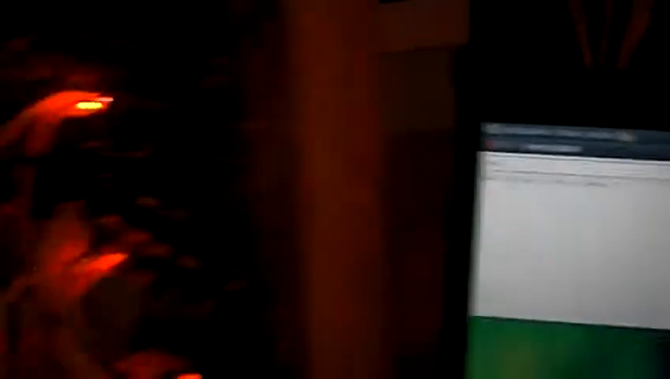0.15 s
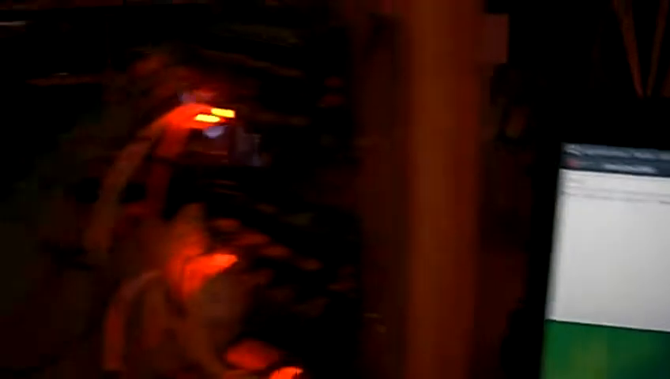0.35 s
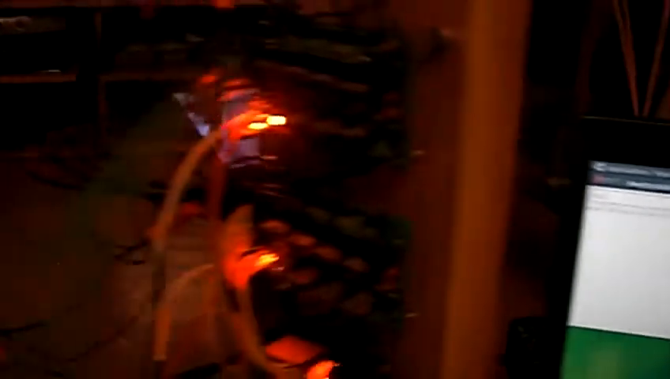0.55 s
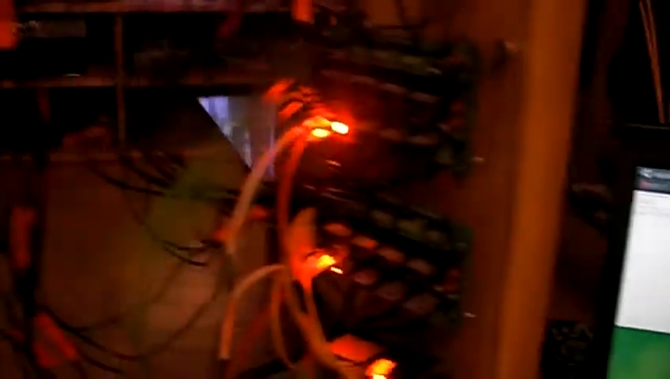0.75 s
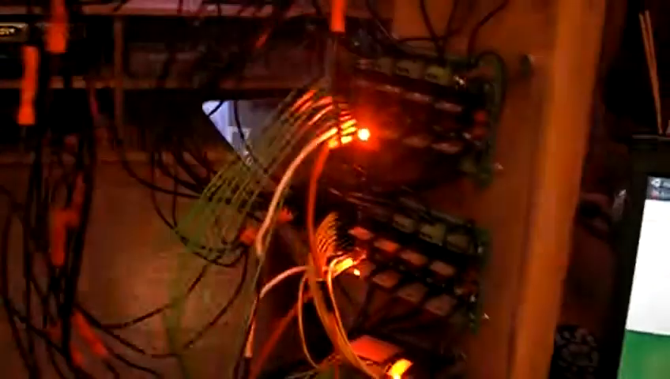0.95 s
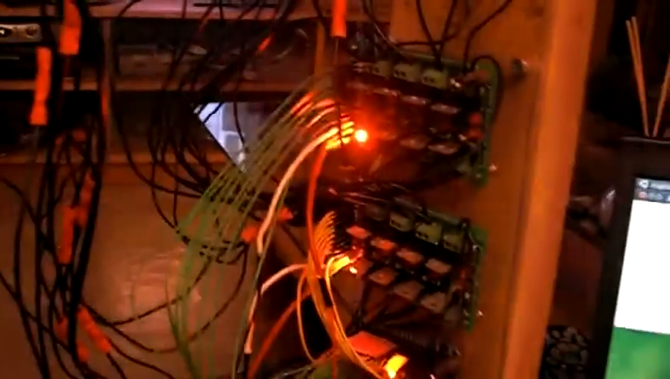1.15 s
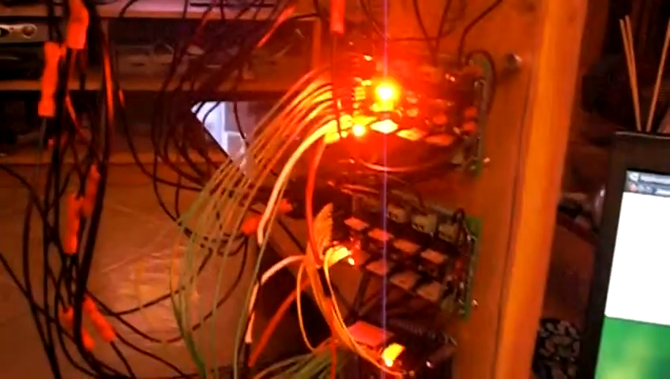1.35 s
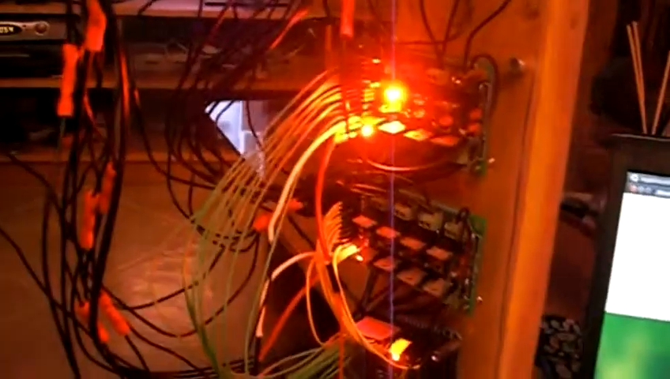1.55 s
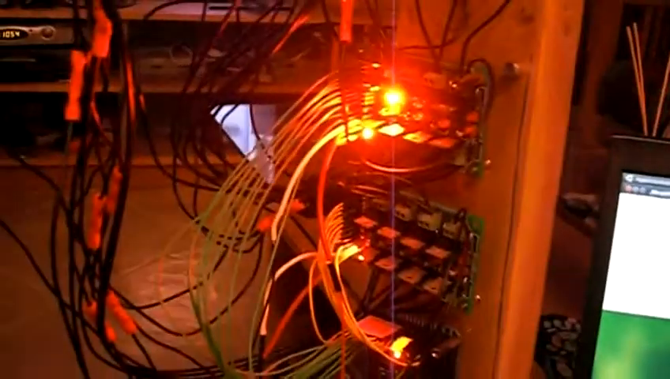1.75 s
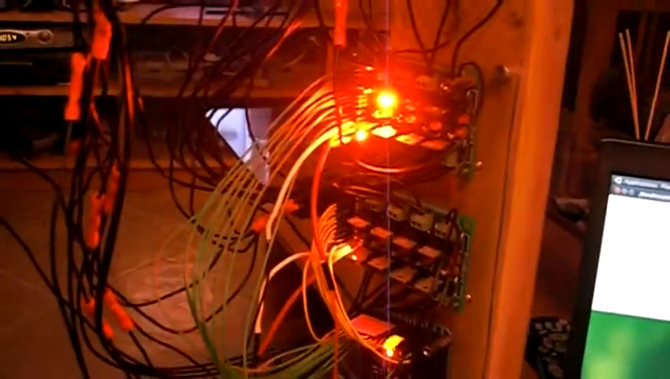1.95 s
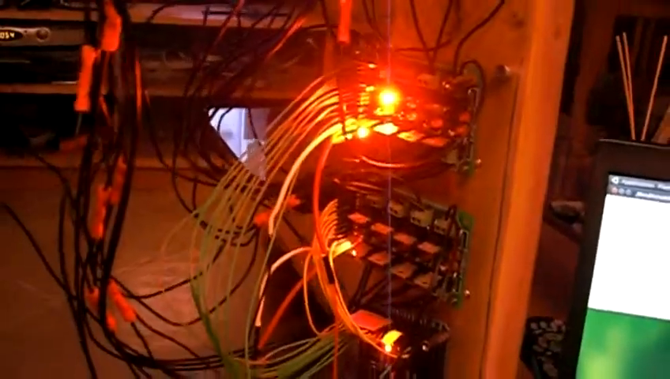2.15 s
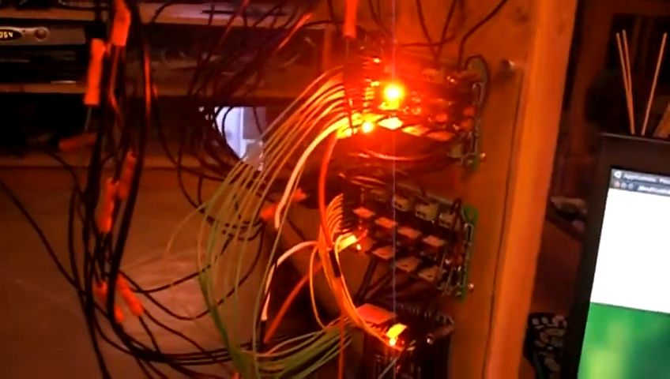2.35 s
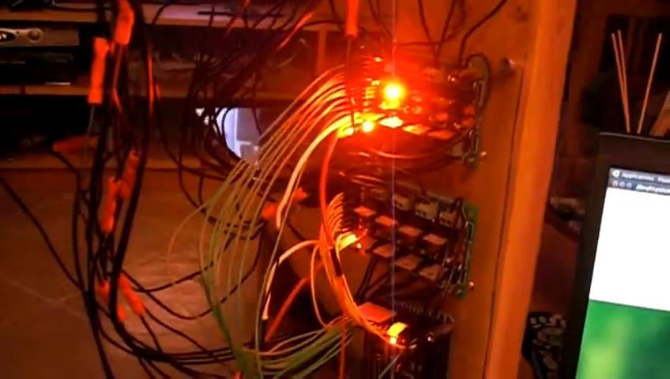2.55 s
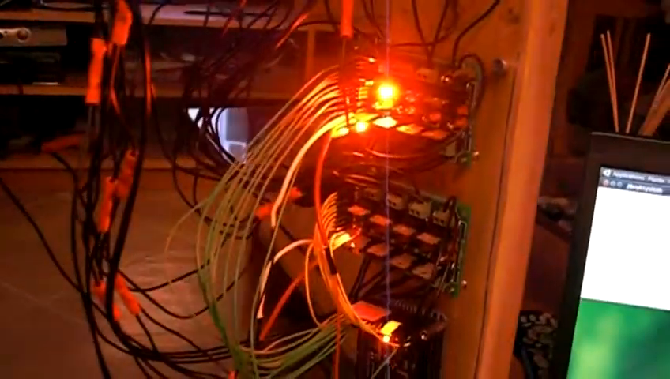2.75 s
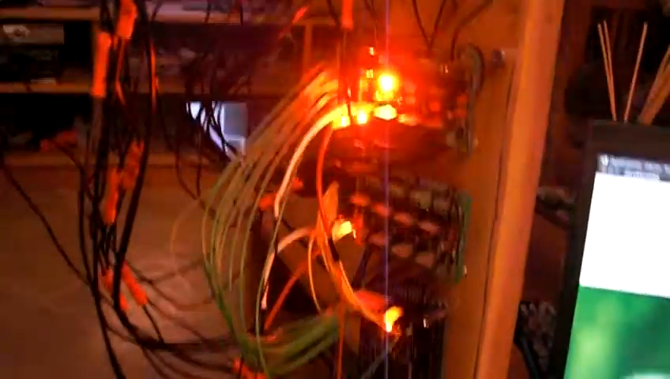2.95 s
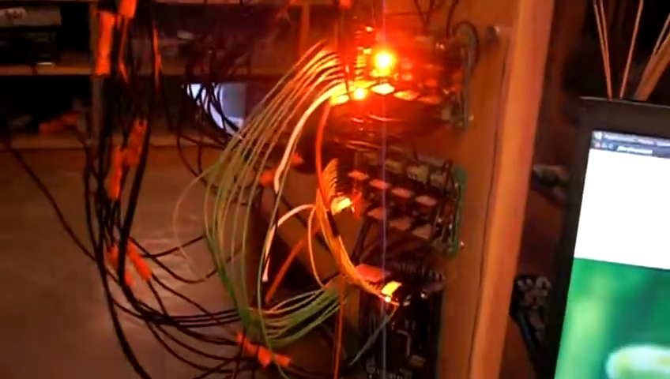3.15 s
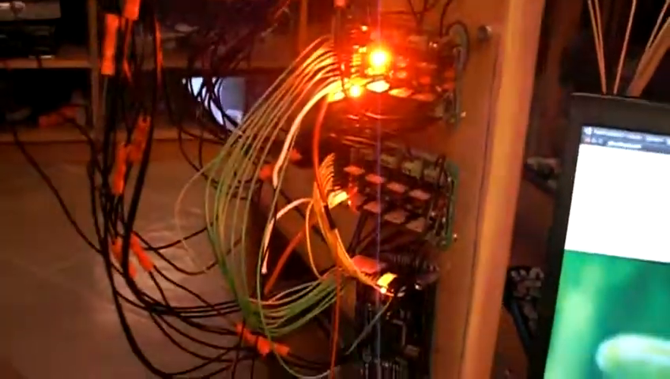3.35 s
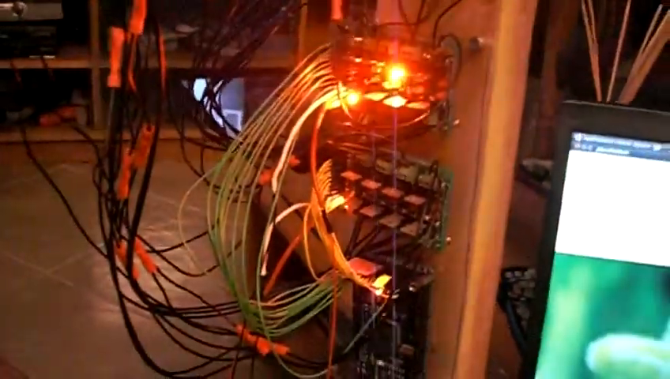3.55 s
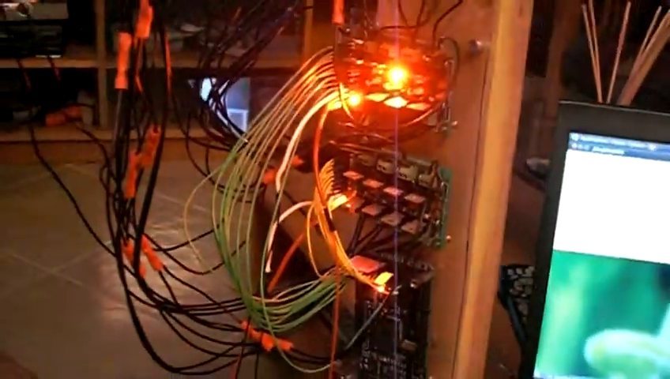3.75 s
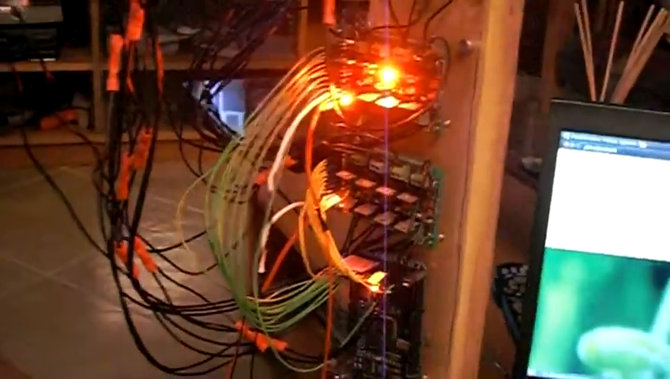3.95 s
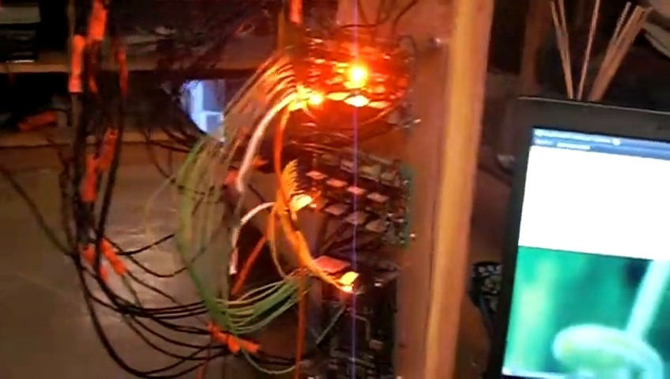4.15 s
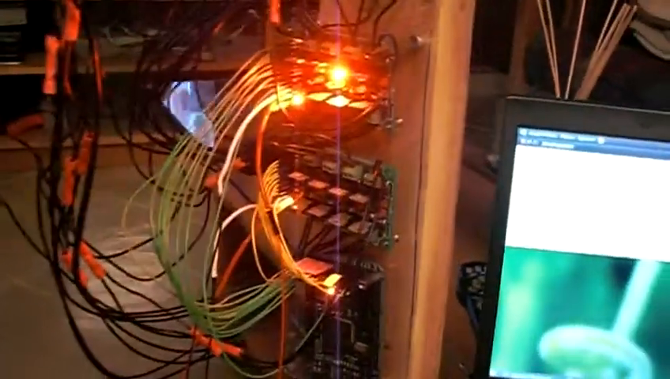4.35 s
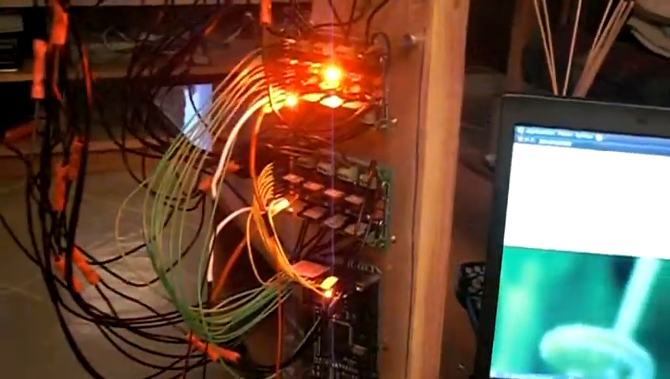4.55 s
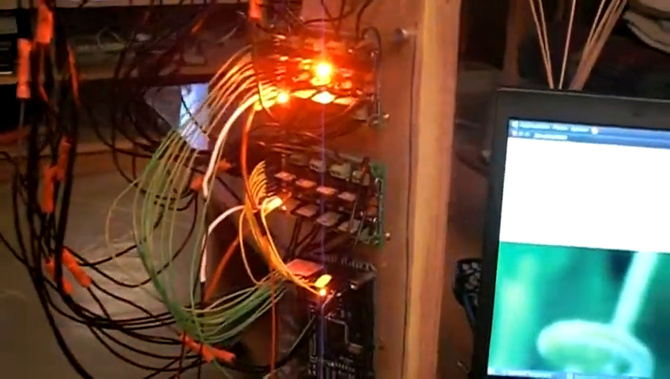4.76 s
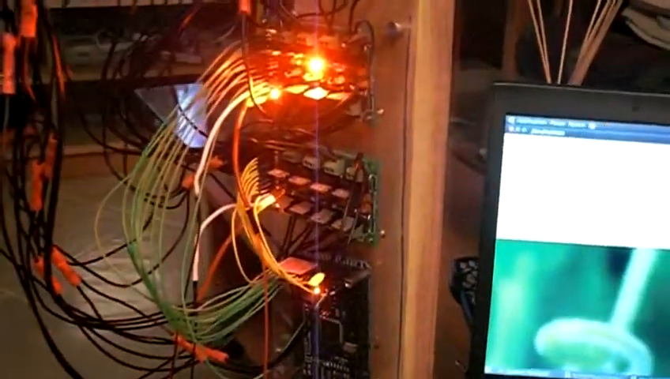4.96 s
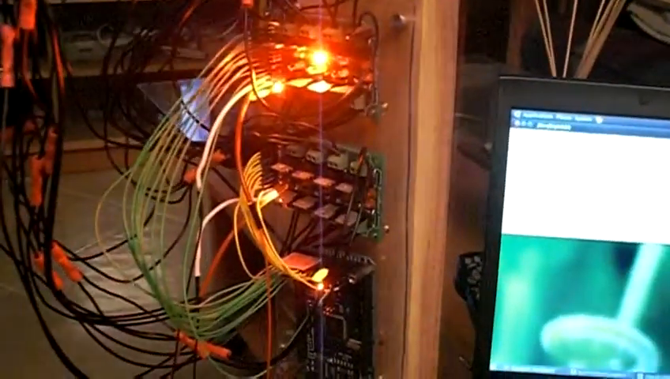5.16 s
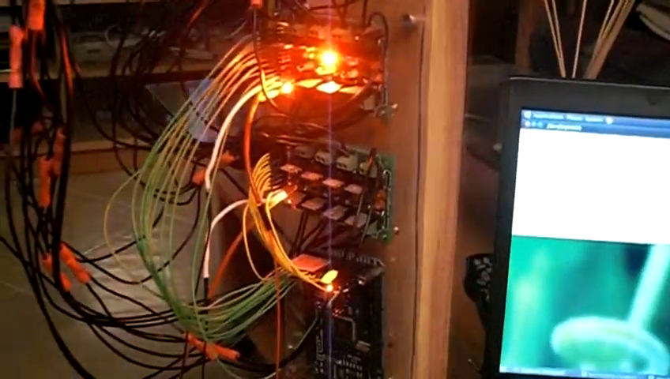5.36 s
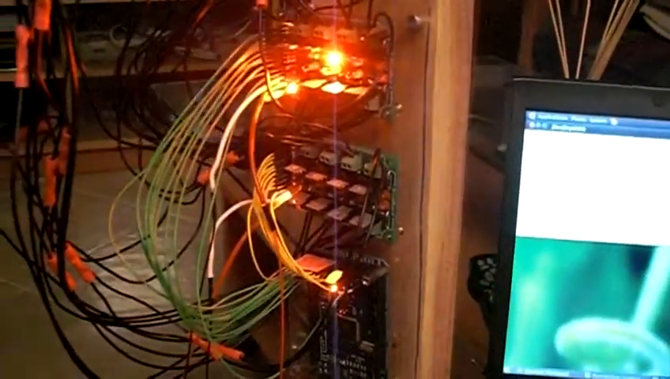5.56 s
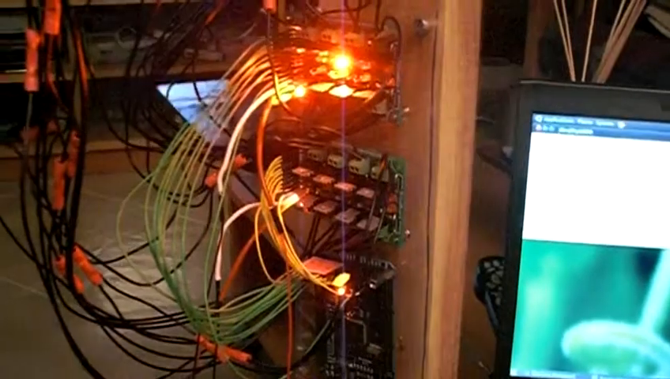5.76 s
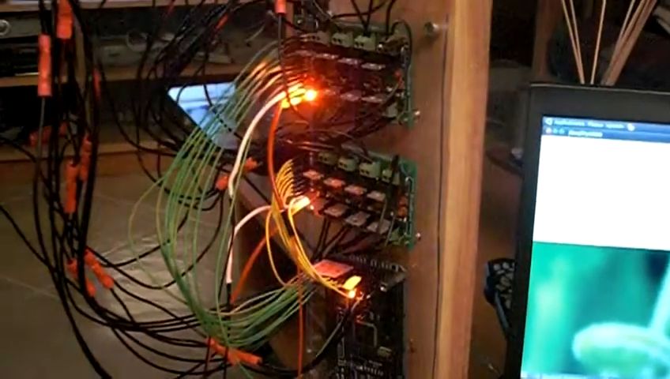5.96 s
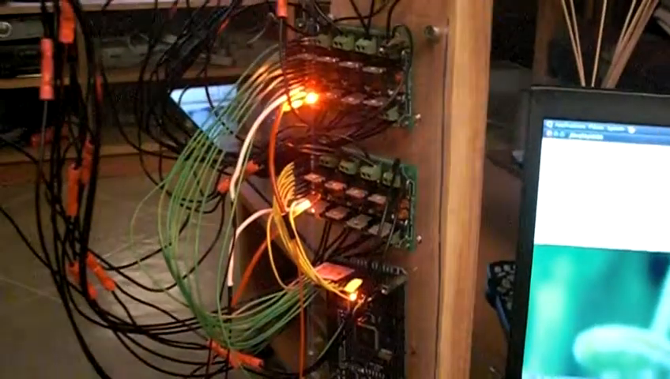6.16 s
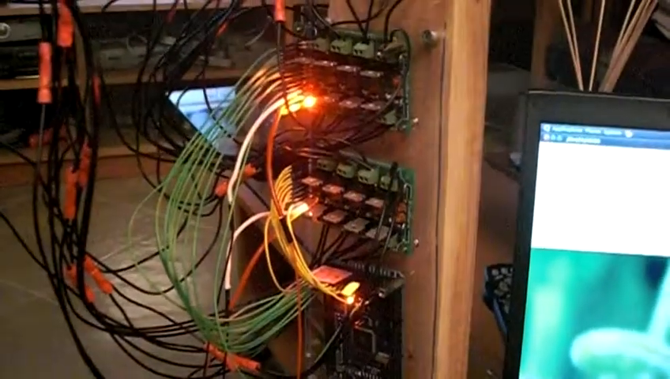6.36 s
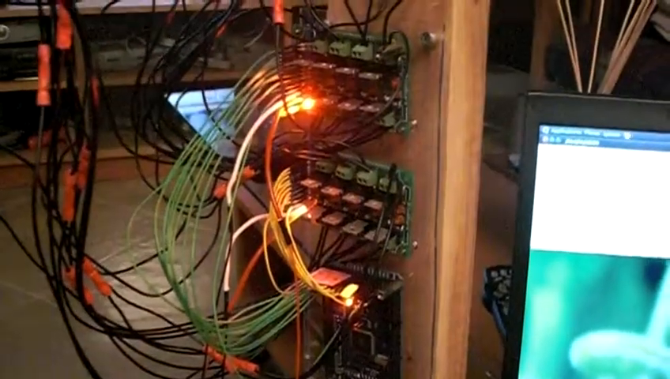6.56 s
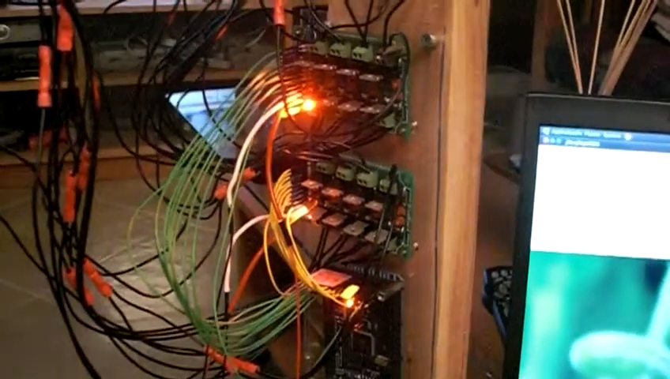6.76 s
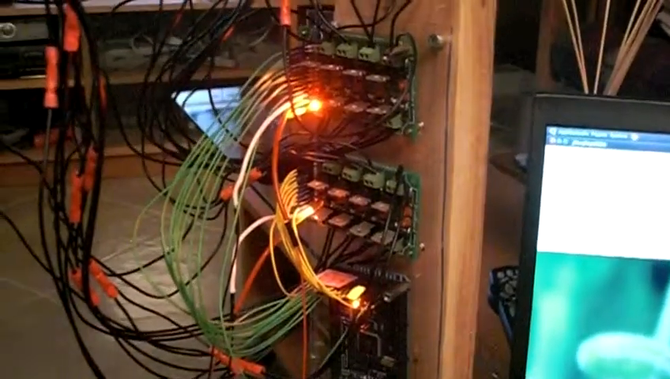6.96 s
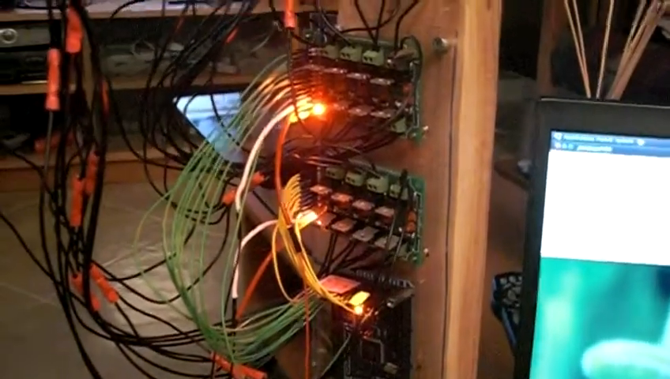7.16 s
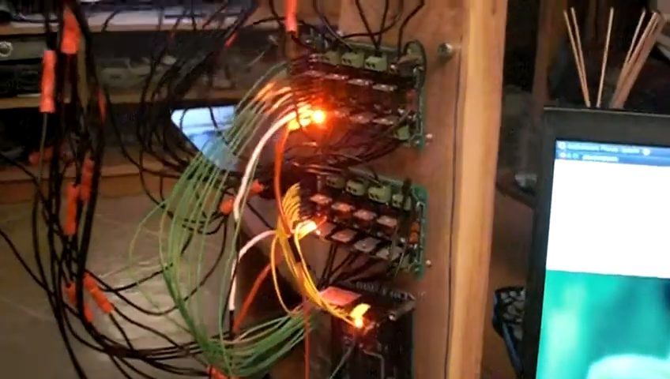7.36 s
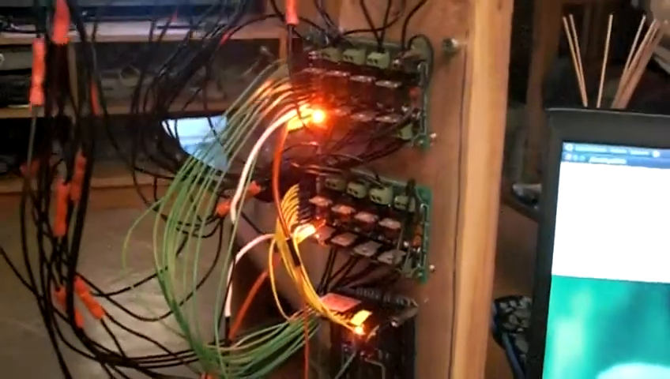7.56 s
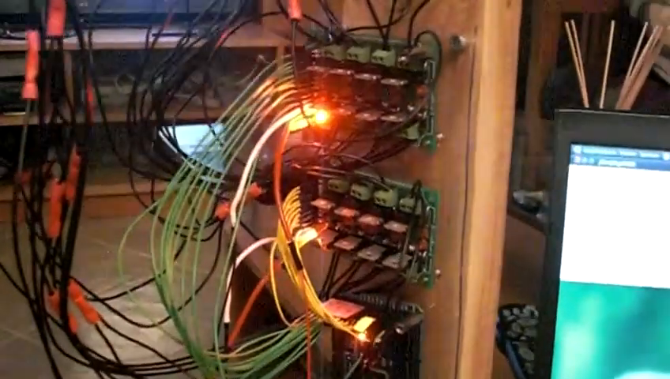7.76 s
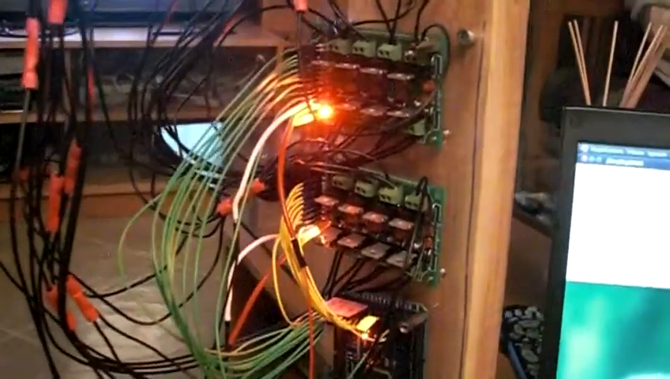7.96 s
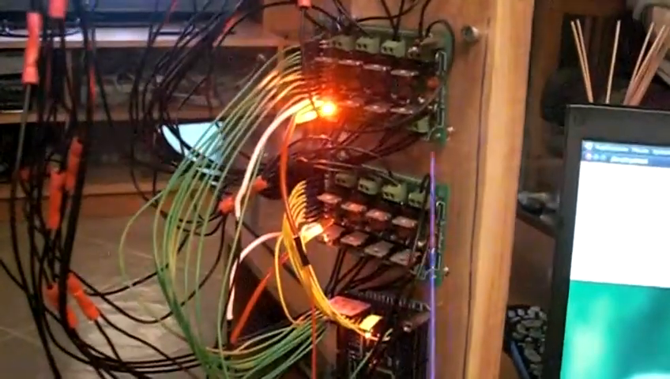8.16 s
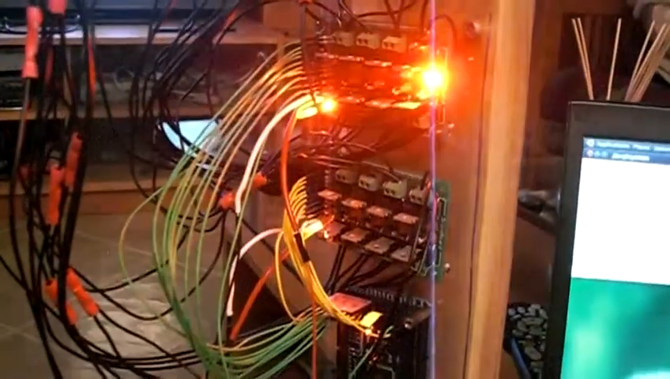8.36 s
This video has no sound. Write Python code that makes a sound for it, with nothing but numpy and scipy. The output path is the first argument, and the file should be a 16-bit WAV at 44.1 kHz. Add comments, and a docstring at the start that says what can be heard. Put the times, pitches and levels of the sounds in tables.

```python
"""A fan rushes steadily in a small room; then four relays (electric switches) snap, 2.3 s apart.
In each, a metal arm hits its stop and bounces, ringing the case and setting a wooden panel humming.
A faint double tick comes just before the first snap, and something is bumped softly after the third.
Loud snaps overload a camera: it turns itself down with a thump; the fan noise drops and creeps back."""
import sys
import numpy as np
from scipy import signal
from scipy.fft import rfft, irfft, next_fast_len
from scipy.io import wavfile

SR = 44100
rng = np.random.default_rng(int(sys.argv[2]) if len(sys.argv) > 2 else 0)


def generate_wav(signal):
    """Clip the signal to [-1, 1] and save it as 16-bit WAV at the path in sys.argv[1]."""
    frames = np.transpose(np.atleast_2d(signal))
    scaled = np.clip(frames, -1, 1) * 32767
    pcm = np.round(scaled).astype(np.int16)
    wavfile.write(sys.argv[1], SR, pcm)


N = 370440  # 8.4 s


def amp(db):
    """Turn decibels into a volume multiplier."""
    return 10 ** (np.asarray(db) / 20)


def unit(x):
    """Scale a sound to an average (rms) level of 1."""
    return x / np.sqrt(np.mean(x ** 2) + 1e-20)


def along(points, hz):
    """Read a smooth value between rows of pitch_hz, value, on a log pitch scale."""
    pitches, values = np.transpose(points)
    return np.interp(np.log(hz + 1), np.log(pitches + 1), values)


def filtered(x, response):
    """Turn each frequency of x up or down by response(hz)."""
    size = next_fast_len(len(x) + SR // 2)
    return irfft(rfft(x, size) * response(np.fft.rfftfreq(size, 1 / SR)), size)[:len(x)]


def noise(colour, size):
    """Noise of level 1 with the given colour (its balance of low and high pitches)."""
    return unit(filtered(rng.standard_normal(size), lambda hz: amp(along(colour, hz))))


def add(track, start_s, sound):
    """Mix a sound into the track at start_s."""
    start = round(start_s * SR)
    track[start:start + len(sound)] += sound[:N - start]


# Colour of the fan's rush: pitch_hz, level_db
FAN_COLOUR = [(18, -56), (30, -24.5), (46, -13), (69, -2), (146, -1.5), (178, -1), (234, -5), (359, -5.5),
              (407, -7.5), (1290, -13.5), (1580, -14), (3020, -17.5), (4870, -17.5), (7840, -25),
              (12000, -37), (15600, -66.5), (22000, -120)]
def fan(air_db=-57.0, hum_db=-73, hum_hz=178, hum_width_hz=5):
    """Moving air makes a steady rush with a faint, fuzzy hum."""
    hum = filtered(rng.standard_normal(N), lambda hz: 1 / (1 + (2 * (hz - hum_hz) / hum_width_hz) ** 2))
    return amp(air_db) * noise(FAN_COLOUR, N) + amp(hum_db) * unit(hum)


# Colour of a soft knock: pitch_hz, level_db
BUMP_COLOUR = [(35, -35), (60, -8), (140, -4), (353, -5.5), (389, -4), (763, -12), (841, -18), (1000, -20),
               (1440, -40), (2380, -30), (6000, -30), (7800, -56.5), (13200, -120)]
# The knocks: start_s, level_db, fade_s (always the time to fall by 60 dB)
BUMPS = [(6.253, -45.5, 0.38), (6.33, -53, 0.163)]
def bumps(rise_s=0.0014):
    """Something is bumped: two dull knocks fade in the room."""
    out, t = np.zeros(N), np.arange(SR // 2) / SR
    for start_s, level_db, fade_s in BUMPS:
        loudness = amp(level_db - 60 * t / fade_s) * (1 - np.exp(-t / rise_s))
        add(out, start_s, noise(BUMP_COLOUR, len(t)) * loudness)
    return out


# Colour of the room's echo: pitch_hz, level_db
ROOM_COLOUR = [(500, -4.5), (1200, 6), (2400, -2.5), (4500, -1), (7200, 2), (8600, 2), (10300, -4),
               (12000, 0)]
# How long each pitch lingers: pitch_hz, fade_s
ROOM_FADES = [(300, .45), (1200, 0.23), (2500, 0.69), (5000, 0.66), (8000, 0.48), (12000, 0.53)]
def room(build_s, size=SR * 3 // 4):
    """Many echoes blur into one tail, in which each pitch fades at its own speed."""
    hz, t, bands = signal.stft(noise(ROOM_COLOUR, size), SR, nperseg=256)
    fade = amp(-60 * t / along(ROOM_FADES, hz)[:, None])
    _, tail = signal.istft(bands * fade * (1 - np.exp(-t / build_s)), SR, nperseg=256)
    return tail / np.linalg.norm(tail)


def near_echo(delay_s, fade_s, size=4096):
    """The nearest surface throws the snap back, scattered by clutter."""
    t = np.arange(size) / SR - delay_s
    echo = rng.standard_normal(size) * (t > 0) * amp(-60 * np.abs(t) / fade_s)
    return echo / np.linalg.norm(echo)


# Colour of metal hitting metal in a small plastic case: pitch_hz, level_db
SNAP_COLOUR = [(100, -30.5), (400, -11.5), (700, -3), (1100, -11), (1600, -2), (3000, -0.5), (8000, -2.5),
               (10500, -8.5), (12000, -4.5), (15000, -31)]
def case_ring(peaks, colour=SNAP_COLOUR, size=4096):
    """One tap on a relay: a broad snap in which some pitches ring out."""
    hz = np.fft.rfftfreq(size, 1 / SR)
    peaks_db = sum(db / (1 + (2 * (hz - pitch) / width) ** 2) for pitch, width, db in peaks)
    # Folding the cepstrum turns these levels into a sound that starts sharply and dies away.
    cepstrum = irfft(np.log(amp(along(colour, hz) + peaks_db)))
    cepstrum[1:size // 2] *= 2
    cepstrum[size // 2:] = 0
    ring = irfft(np.exp(rfft(cepstrum)))
    return ring / np.linalg.norm(ring)


def chatter(length_s, rattle_db, rattle_fade_s, size=2048):
    """One hit is a burst of tiny impacts, followed by a weaker rattle of the board."""
    t = np.arange(size) / SR
    window = np.exp(-(t / length_s) ** 8)
    burst = rng.standard_normal(size) * window
    for _ in range(8):  # even out all pitches while keeping the burst short
        spectrum = rfft(burst)
        burst = irfft(spectrum / (np.abs(spectrum) + 1e-12)) * window
    burst = burst / np.linalg.norm(burst) * np.sqrt(length_s * SR)
    rattle = amp(rattle_db - 60 * t / rattle_fade_s) * rng.standard_normal(size)
    return burst + rattle * (1 - np.exp(-t / length_s))


# Pitches that ring in the faint tick: pitch_hz, width_hz, boost_db
TICK_PEAKS = [(2192, 310, 9), (3525, 350, 14), (4800, 600, 5.5), (6013, 500, 3), (8000, 700, 5)]
# The double tick: start_s, level_db, chatter_s
TICKS = [(1.2468, -39.5, 0.0011), (1.2486, -39.5, .0012)]
def ticks():
    """Two light touches, too weak to make the room echo."""
    out, ring = np.zeros(N), case_ring(TICK_PEAKS)
    for start_s, level_db, chatter_s in TICKS:
        touch = chatter(chatter_s, rattle_db=-6.0, rattle_fade_s=0.027)
        add(out, start_s, amp(level_db) * signal.fftconvolve(touch, ring))
    return out


def switch_times(first_s=1.2781, step_s=2.3152):
    """A timer switches the relays one by one, evenly spaced."""
    return first_s + step_s * np.arange(len(SWITCHINGS))


# The wooden panel's own notes: pitch_hz, level_db, fade_s
PANEL_NOTES = [(217, -4, .4), (240.4, 1, 0.39), (261, -1.5, .55), (293, -1.5, 0.51), (343, -8.5, 0.38),
               (440, -13.5, .3), (550, -13.5, .3)]
def thump_and_panel_hum(swell_s=.02, lag_s=0.005, thump_hz=76, sharpness=1.9):
    """A low thump comes with each loud snap as the camera turns itself down; the panel hums just after."""
    out, t = np.zeros(N), np.arange(SR * 3 // 4) / SR
    hum_age = np.maximum(t - lag_s, 0)
    swell = 1 - np.exp(-hum_age / swell_s)
    thump_filter = lambda hz: -hz * hz / (thump_hz ** 2 - hz * hz + 1j * hz * thump_hz / sharpness)
    for start_s, (*_, hum_db, thump_db, thump_width_s) in zip(switch_times(), SWITCHINGS):
        pulse = -(t / thump_width_s) ** 2 * np.exp(1 - (t / thump_width_s) ** 2)
        hum = sum(amp(db - 60 * hum_age / fade_s) * np.sin(2 * np.pi * (hz * t + rng.random()))
                  for hz, db, fade_s in PANEL_NOTES)
        add(out, start_s, amp(thump_db) * filtered(pulse, thump_filter) + amp(hum_db) * hum * swell)
    return out


def arm_hits(time_s, motion, level_db, chatter_s, bounce_loss_db, touch_s=.0006):
    """The arm touches, hits its stop and bounces twice. Gives rows of time_s, level_db, chatter_s."""
    lead_s, touch_db, flight_s = motion
    hits = [(time_s - lead_s, level_db + touch_db, touch_s), (time_s, level_db, chatter_s)]
    for bounce in range(2):  # each is quicker, weaker and shorter
        time_s += flight_s * 0.93 ** bounce
        level_db -= bounce_loss_db
        chatter_s *= .9
        hits.append((time_s, level_db, chatter_s))
    return hits


def soften(blow, age_s, dull_per_s=28):
    """The later a bounce comes, the softer and duller it lands."""
    dullness = np.clip(dull_per_s * age_s, 0, .9)
    return signal.lfilter([1 - dullness], [1, -dullness], blow)


# Where each relay's case rings: pitch_hz, width_hz, boost_db (below 0 is a dip)
CASE_A = [(850, 490, -7.5), (2954, 490, 4.5), (4510, 1100, 14), (6160, 350, 8.5), (7500, 1000, 11.5),
          (8400, 650, 5.5), (10000, 450, 7.5), (11620, 390, 7.5)]
CASE_B = [(2140, 250, 8.1), (3530, 520, 7.9), (4530, 390, 10), (5780, 240, 7.3), (6700, 280, 6.8),
          (7520, 580, 13), (9750, 550, 12), (11400, 670, 10)]
CASE_C = [(1150, 200, 13), (2140, 520, 10.6), (3195, 380, 9.2), (3860, 440, 9.4), (4260, 460, 11.3),
          (4880, 620, 14), (6850, 410, 5.5), (7590, 710, 11), (9740, 1500, 14), (11700, 410, 3.5)]
CASE_D = [(1400, 600, 3), (2720, 140, 13), (3330, 570, 9.7), (4590, 1300, 12.4), (5860, 440, 11.6),
          (6600, 510, 9.2), (7780, 1400, 14), (8700, 630, 8.3), (9500, 700, 11), (11660, 370, 5.6)]
# Colour that each relay spreads through the room: pitch_hz, level_db
SPREAD_A = [(350, -41.5), (600, -12), (852, -18.5), (1020, -23.5), (1070, -31), (1170, -18), (1410, -23),
            (1640, -11), (2020, -12.5), (2290, -8), (4570, -0.5), (12000, -16), (15600, -44), (22000, -120)]
SPREAD_B = [(350, -52), (600, -21.5), (724, -27.5), (896, -16), (966, -20.5), (1110, -8), (1390, -20),
            (2270, -2.5), (4350, -6), (6020, -13), (7000, 0), (12000, -17.5), (15600, -51), (22000, -120)]
SPREAD_C = [(350, -46), (600, -18), (978, -5), (1140, 1.5), (1440, -10.5), (2100, -5.5), (2290, -2),
            (3430, -10.5), (4630, 0.5), (5520, -16), (7640, -12), (12000, -26), (15600, -58), (22000, -120)]
SPREAD_D = [(350, -59), (600, -25.5), (752, -9.5), (863, -30.5), (942, -21.5), (1660, -10), (2130, -12.5),
            (2870, -1.5), (3690, -9.5), (6330, -8), (7180, -0.5), (12000, -15), (15600, -46), (22000, -120)]
# Pings of its spring and contact strips, heard through the room: pitch_hz, width_hz, boost_db
PINGS_A = [(1700, 80, 6), (2320, 70, 8), (3010, 90, 1.5), (4560, 120, 2), (7400, 100, 6), (8460, 200, 4.5),
           (11400, 700, 3.5)]
PINGS_B = [(2280, 86, 3), (3960, 200, 2), (4650, 300, 2.7), (7260, 200, 1), (8150, 400, 3.6),
           (11500, 800, 6)]
PINGS_C = [(1185, 62, 4.7), (2000, 55, 3), (2550, 60, 4.5), (4380, 120, 2), (4793, 40, 7), (6850, 87, 3)]
PINGS_D = [(1630, 60, 5.3), (2870, 58, 8), (4730, 500, 7.7), (5950, 80, 3.1), (6990, 70, 4), (7950, 150, 2),
           (11900, 310, 8.5)]
# How the arm moves, relative to its main hit: touch_lead_s, touch_db, first_bounce_s
PULL_IN = (0.00087, -29, .003)  # the coil snatches it and holds it tight
RELEASE = (.0042, -1, .0103)  # the spring throws it back to bounce freely
# One row per relay: motion, level_db, chatter_s, bounce_loss_db, room_db, echo_db,
# panel_hum_db, thump_db, thump_width_s
SWITCHINGS = [(PULL_IN, -8, .002, 6.4, -9.5, -10, -42.5, -7.5, .0014),
              (PULL_IN, -5, 0.0016, 12, -11.5, -17, -41, -17, .001),
              (RELEASE, -22, 0.0018, 4, -10, -10, -42, -70, .001),
              (PULL_IN, -8.5, 0.0019, 16, -12.5, -14.5, -47.5, -18, 0.00077)]
def relays():
    """Each relay's arm rings its own case; a near surface and the room echo it."""
    out = np.zeros(N)
    voices = [(CASE_A, SPREAD_A, PINGS_A), (CASE_B, SPREAD_B, PINGS_B),
              (CASE_C, SPREAD_C, PINGS_C), (CASE_D, SPREAD_D, PINGS_D)]
    for start_s, switching, (case, spread, pings) in zip(switch_times(), SWITCHINGS, voices):
        *stroke, room_db, echo_db = switching[:6]
        ring = case_ring(case)
        echo = amp(echo_db) * signal.fftconvolve(ring, near_echo(delay_s=0.0115, fade_s=.04))
        tail = amp(room_db) * signal.fftconvolve(case_ring(pings, spread), room(build_s=0.0027))
        hits = arm_hits(start_s, *stroke)
        for time_s, level_db, chatter_s in hits:
            blow = chatter(chatter_s, rattle_db=-11, rattle_fade_s=0.046)
            blow = amp(level_db) * soften(blow, time_s - start_s)
            add(out, time_s, signal.fftconvolve(blow, ring))
            add(out, time_s, signal.fftconvolve(blow, echo))
        # One room tail carries the energy of all the hits, starting at the main one.
        energy = sum(amp(level_db) ** 2 * chatter_s * SR for _, level_db, chatter_s in hits)
        add(out, start_s, np.sqrt(energy) * tail)
    return out


def scene():
    """All the sounds mixed into one channel."""
    return (relays() + ticks() + thump_and_panel_hum() + bumps() + fan())[None]


def auto_volume(x, threshold_db=-19.5, recover_db_per_s=4.0, attack_s=0.0005, size=132):
    """A loud snap pulls the camera's volume down at once; it climbs back slowly."""
    power = signal.lfilter(np.ones(size) / size, 1, x ** 2)
    excess_db = np.maximum(10 * np.log10(np.abs(power) + 1e-12) - threshold_db, 0)
    recovery_db = recover_db_per_s * np.arange(N) / SR
    cut_db = np.maximum.accumulate(excess_db + recovery_db) - recovery_db
    smoothing = np.exp(-1 / (attack_s * SR))
    return x / (1 + signal.lfilter([1 - smoothing], [1, -smoothing], amp(cut_db) - 1))


def record(dry, ceiling_db=-8.5, low_cut_hz=50, high_cut_hz=12200):
    """The camera turns itself down, squashes loud peaks and loses the lowest and highest pitches."""
    x = amp(ceiling_db) * np.tanh(auto_volume(dry[0]) / amp(ceiling_db))
    x = signal.sosfilt(signal.butter(4, low_cut_hz, "highpass", fs=SR, output="sos"), x)
    return filtered(x, lambda hz: 1 / np.sqrt(1 + (hz / high_cut_hz) ** 200))[None]


dry = scene()
out = record(dry)
generate_wav(out)
```